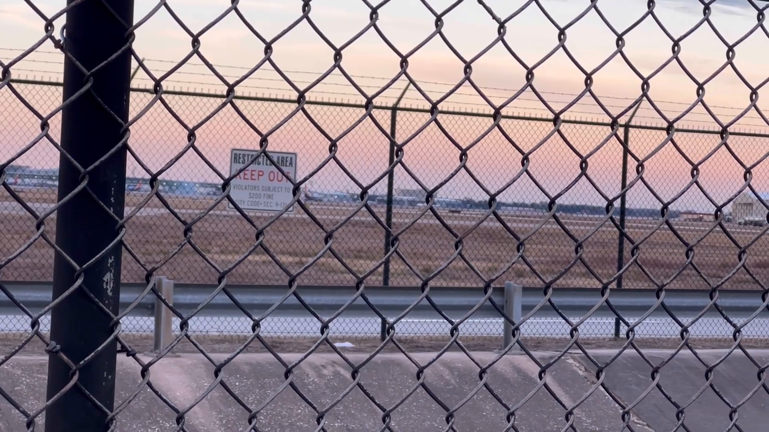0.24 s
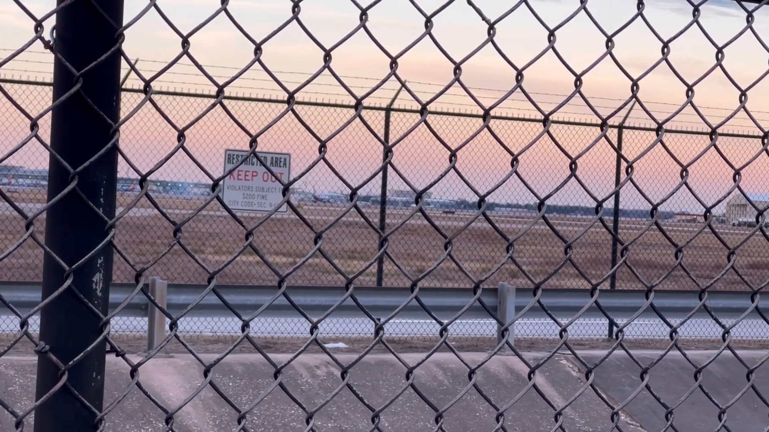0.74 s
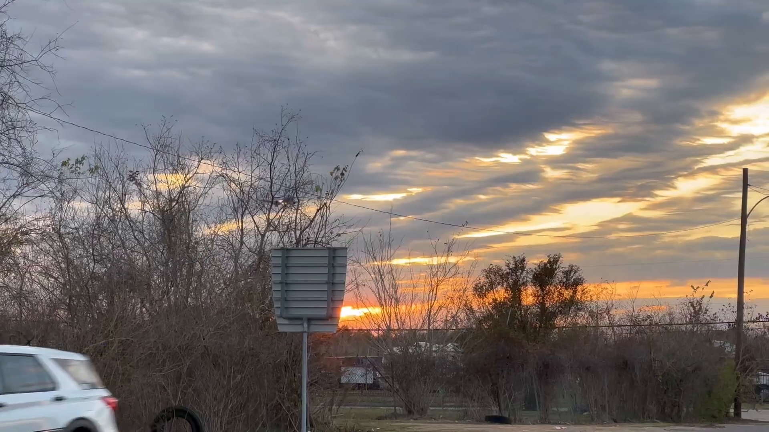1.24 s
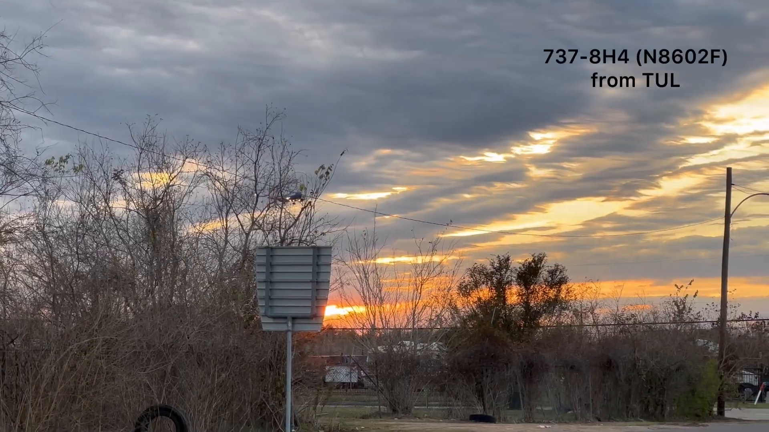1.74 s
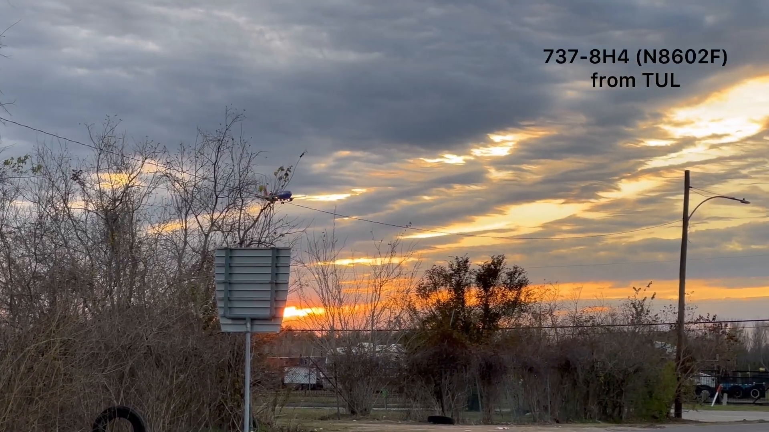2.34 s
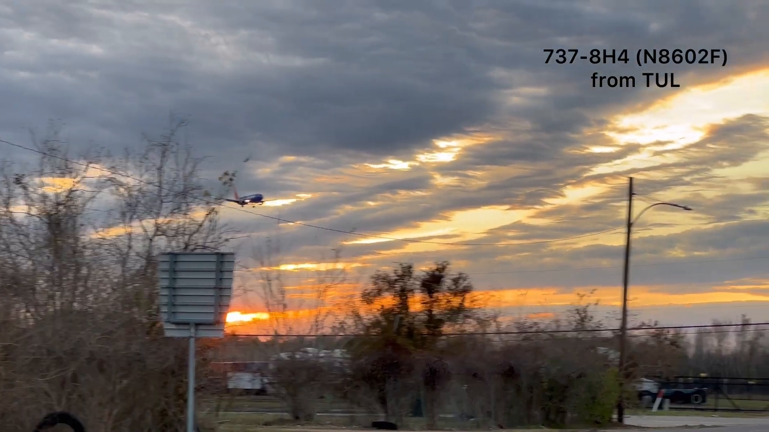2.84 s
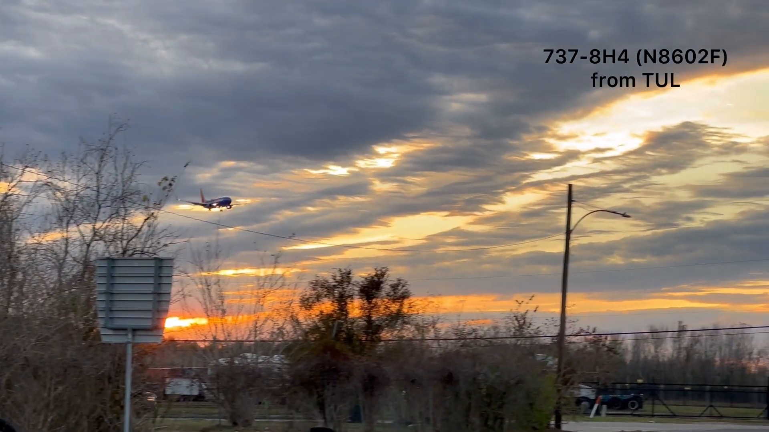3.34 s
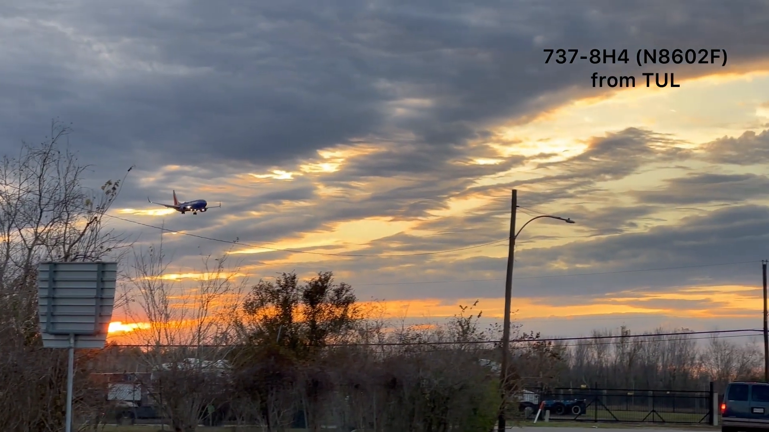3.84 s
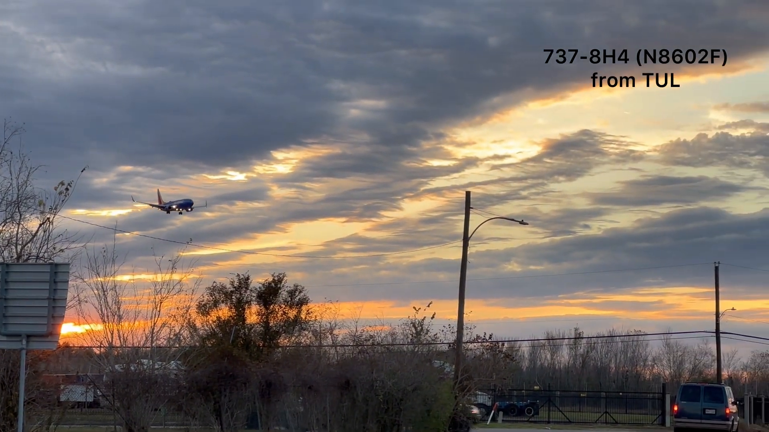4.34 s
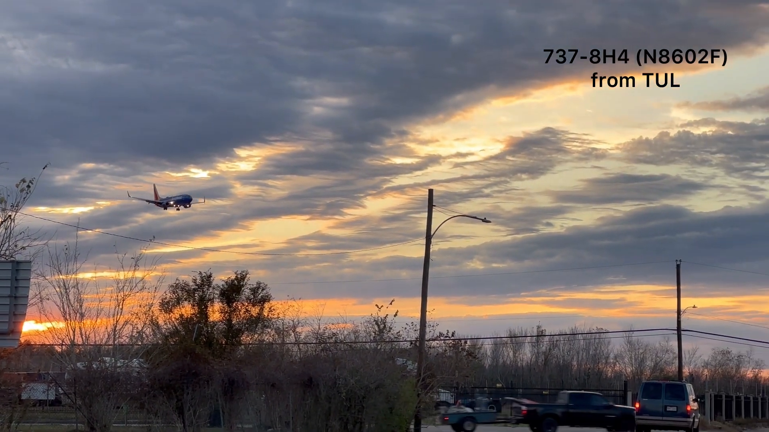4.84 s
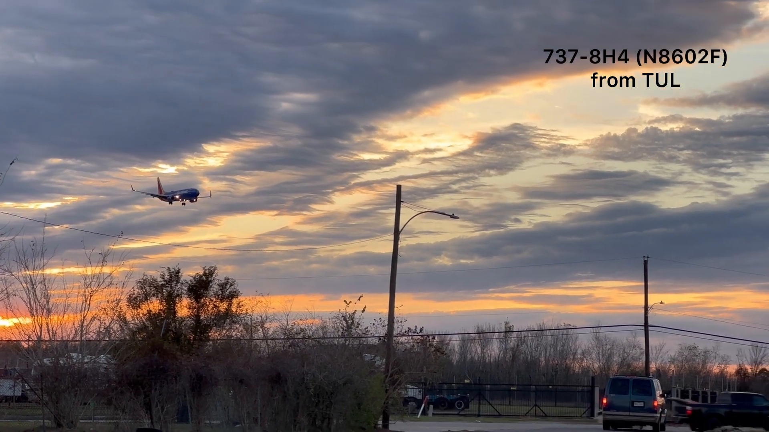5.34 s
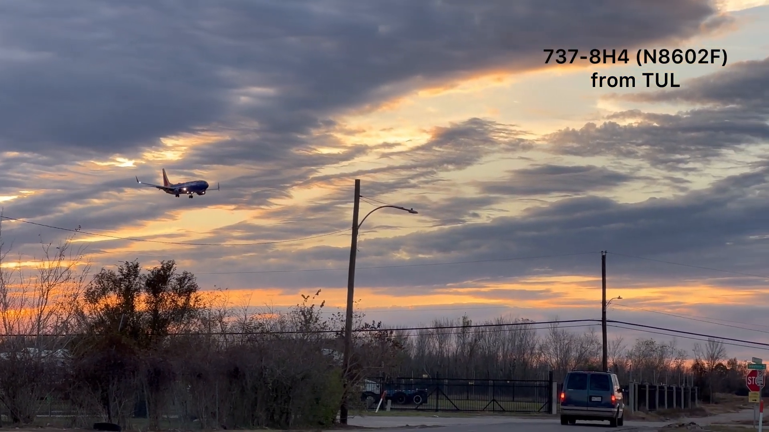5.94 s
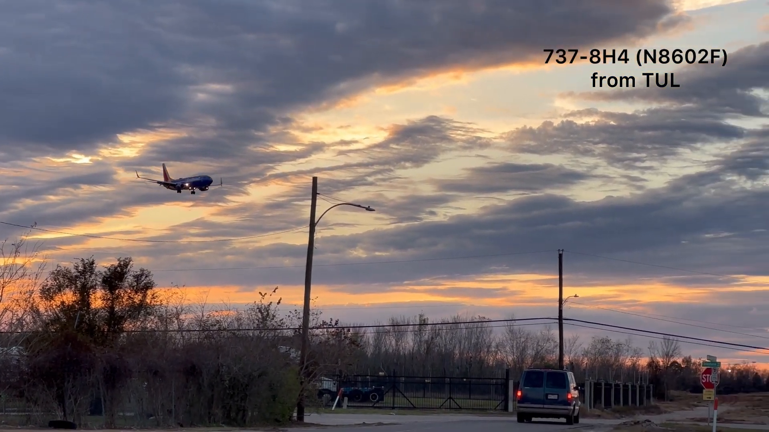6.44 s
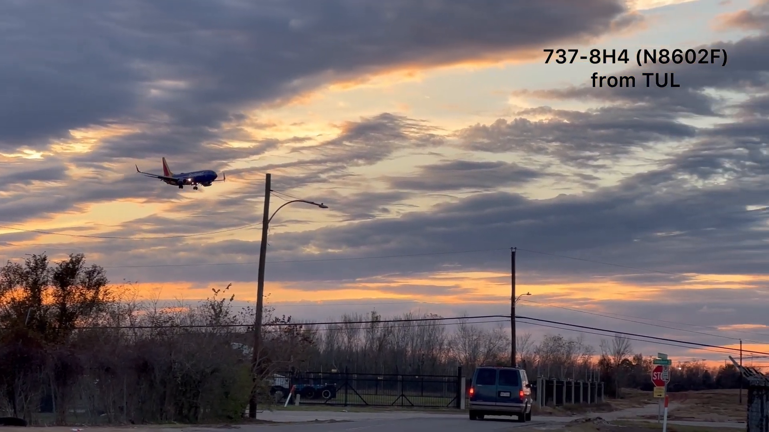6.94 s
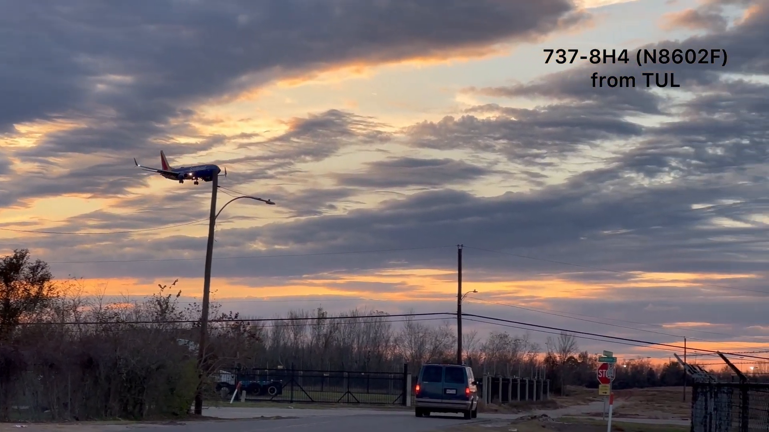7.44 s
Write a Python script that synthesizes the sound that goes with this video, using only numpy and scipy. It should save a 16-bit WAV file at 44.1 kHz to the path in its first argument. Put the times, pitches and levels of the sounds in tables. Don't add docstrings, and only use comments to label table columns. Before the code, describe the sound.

For the first 1.2 seconds, a low, far engine drone near 100 Hz sits over soft airfield hum, dipping deeply around 0.5 and briefly at 1.05. The scene then cuts abruptly to a louder roadside. Deep traffic rumble and surging heavy-engine throbs lie below a steady low drone. A car is already close: its tread roar, whoosh and bright hiss peak around 2.5, with hollow tyre resonance and tiny sharp stone clicks mostly from 1.7 to 2.9. It recedes from 3 to 5. A wavering, flickering fan whine near 1.6 kHz, with a lower whistle, strengthens and sinks slightly. The airliner's broad rushing roar, coloured by ground echo, swells from about 4, strongest near 7.1, with an added higher overtone after 5.4. Faint rustles come at 1.4, 4.5 and 6.5. It ends at 7.7 with the jet still near; wide outdoor stereo, phone microphones.

```python
import sys
import numpy as np
from scipy import signal
from scipy.fft import rfft, irfft, next_fast_len
from scipy.io import wavfile
from scipy.ndimage import uniform_filter1d, map_coordinates

SR = 44100
rng = np.random.default_rng(int(sys.argv[2]) if len(sys.argv) > 2 else 0)


def field_ratio(decibels):
    return 10 ** (np.asarray(decibels, dtype=float) / 20)


def materialize(psi):
    bounded = np.clip(np.atleast_2d(psi).T, -1, 1)
    quanta = np.round(bounded * 32767).astype(np.int16)
    wavfile.write(sys.argv[1], SR, quanta)


N = 340011
TIME_S = np.arange(N) / SR
CHANGE = 51488


def unit(x):
    return x / np.sqrt(np.mean(np.abs(x) ** 2) + 1e-20)


def along(points, hz):
    f, *columns = np.transpose(points)
    return [np.interp(np.log(hz + 1), np.log(f + 1), column) for column in columns]


def curves(rows, t=TIME_S):
    s, *columns = np.transpose(rows)
    return [np.interp(t, s, column) for column in columns]


def bumps(rows, t):
    return sum(db * np.exp(-((t - s) / half_s) ** 2) for s, db, half_s in rows)


def together(*dbs):
    return 10 * np.log10(sum(field_ratio(db) ** 2 for db in dbs))


def wobble(rate):
    coarse = np.arange(0, N + 32, 32)
    knots = rng.standard_normal(int(N * rate / SR) + 4)
    return np.interp(np.arange(N), coarse, map_coordinates(knots, [coarse * rate / SR]))


def tone(hz, db, blur):
    return np.sqrt(2) * field_ratio(db) * np.cos(2 * np.pi * np.cumsum(hz) / SR + blur)


# f/Hz, left lead [rad], likeness [0-1]
PORT_PAIR = [(2000, 0, .99), (2650, .05, .995), (2900, .5, .98), (4400, .45, .95), (4900, 0, .997),
             (6500, .05, .99), (7200, 1.3, .97), (7800, 2.9, .99), (8500, 3.14, .995), (9000, 1.9, .95),
             (9800, .6, .9), (10800, 0, .98), (13000, -.1, .9), (14000, -.6, .6), (15000, -2, .5)]


def rush(air, band, sides, gain_db, patchy_db, size=1024):
    hz, t, noise = signal.stft(rng.standard_normal((2, N)), SR, nperseg=size)

    beyond = np.maximum(np.log2((hz + 1) / air[-1][0]), np.log2(air[0][0] / (hz + 1)))
    shape = field_ratio(along(air, hz)[0] - 48 * np.clip(beyond, 0, None))
    inside = (hz >= band[0]) & (hz <= band[1])
    shape = shape / np.sqrt(np.mean(shape ** 2 * inside))

    grain = uniform_filter1d(rng.standard_normal(noise.shape[1:]), size // 100, 0)
    grain = uniform_filter1d(grain, 8200 // size, 1)
    patches = field_ratio(patchy_db * unit(grain))
    patches_rms = np.sqrt(np.mean(patches ** 2))

    alike, lead, left_db = along(sides, hz)
    bass = hz < PORT_PAIR[0][0]
    alike = np.where(bass, alike, along(PORT_PAIR, hz)[1])
    lead = np.where(bass, lead, 0)
    left_db = left_db * np.clip(2 - hz / 1100, 0, 1)

    turn = np.arccos(np.clip(alike, 0, 1))[:, None] / 2
    shared, apart = np.cos(turn) * noise[0], np.sin(turn) * noise[1]
    half = (field_ratio(left_db / 2) * np.exp(.5j * lead))[:, None]
    pair = [(shared + apart) * half, (shared - apart) / half]
    gain = shape[:, None] * patches / patches_rms * field_ratio(gain_db(hz[:, None], t))
    return signal.istft(pair * gain, SR, nperseg=size)[1][:, :N]


# t/s, level/dB, half length [s]
ENGINE_LULLS = [
    (.33, -3, 0.087),
    (.49, -19, 0.092),
    (.93, -2.5, .08),
    (1.045, -15, 0.044),
]


def far_engines():
    turns = 2 * np.pi * 97 * (np.arange(N) - CHANGE) / SR
    in_step_s, beat_s = 0.76, 0.65
    beat = np.cos(2 * np.pi * (TIME_S - in_step_s) / beat_s)
    first = -field_ratio(-31 + bumps(ENGINE_LULLS, TIME_S)) * np.cos(turns)
    second = beat * field_ratio(-43.5) * np.cos(2 * turns + .5 * wobble(14.0))
    return np.sqrt(2) * (first + second)


# f/Hz, level/dB per Hz
HUM_AIR = [(25, -15), (45, -7), (60, 3), (130, -3.5), (230, -15), (400, -26.5), (800, -25.5), (1500, -30),
           (2500, -41), (3600, -51), (4500, -60.5), (7000, -63), (9600, -80.5), (15000, -76)]
# f/Hz, likeness [0-1], left lead [rad], left-right level/dB
HUM_SIDES = [(80, 0.99, 0.0, 0.5), (200, 0.9, 0.1, 2.2), (400, 0.6, 1.2, 0.6), (600, 0.65, 1.5, -0.0),
             (850, 0.69, 1.5, 0.7), (1200, 0.57, 0.8, -1.7), (1700, 0.77, 0.1, 0.1)]


def airfield_hum():
    return rush(HUM_AIR, (250, 2000), HUM_SIDES, lambda hz, t: -47.5, patchy_db=-1.0, size=2048)


# t/s, level/dB
RUMBLE = [(1.2, -36.5), (2.05, -37), (2.4, -34), (3.6, -30.5), (4.9, -33), (5.8, -31.5), (6.9, -31),
          (7.3, -28), (7.7, -29.5)]
# f/Hz, level/dB per Hz
RUMBLE_AIR = [(25, -35.5), (40, -28.5), (60, 5), (90, -3), (140, -3.5), (200, -7), (300, -13), (450, -25)]
# f/Hz, likeness [0-1], left lead [rad], left-right level/dB
ROAD_SIDES = [(80, 0.99, 0.1, 0.0), (200, 0.98, 0.2, 0.4), (400, 0.93, 0.3, -0.0), (600, 0.69, 0.9, 0.7),
              (850, 0.76, 0.8, 1.2), (1200, 0.71, 0.6, 1.0), (1700, 0.97, -0.0, 1.0)]


def traffic_rumble():
    return rush(RUMBLE_AIR, (110, 300), ROAD_SIDES, lambda hz, t: curves(RUMBLE, t)[0],
                patchy_db=0.6, size=2048)


# f/Hz, level/dB per Hz
DEEP_AIR = [(25, -33.5), (40, -24), (60, -4.5), (80, -15), (110, -11)]
# t/s, level/dB, half length [s]
HEAVY_SURGES = [
    (1.22, 9.5, 0.11),
    (1.55, 8, 0.17),
    (1.9, 9.5, .05),
    (2.45, 7.5, 0.18),
    (3.2, 3, 0.33),
    (3.9, 5, 0.097),
    (4.6, 8, 0.21),
    (5.27, 5.5, .06),
    (5.8, 4.5, .2),
]


def heavy_throb():
    throb = rush(DEEP_AIR, (35, 80), ROAD_SIDES, lambda hz, t: -33 + bumps(HEAVY_SURGES, t),
                 patchy_db=3.0, size=4096)
    return field_ratio(-3.5) * throb


# t/s, f/Hz, level/dB
ROAD_DRONE = [(1.17, 92.5, -37), (2, 92, -28.5), (2.6, 91, -29.5), (3.3, 90, -29), (3.7, 89.5, -43.5),
              (4.6, 88, -37), (5.3, 87.5, -33.5), (6.3, 87, -27.5), (7, 86.5, -33), (7.71, 86.5, -26.5)]


def engine_drone():
    hz, db = curves(ROAD_DRONE)
    return tone(hz, db + 2.4 * wobble(3.5), 0.077 * wobble(4))


# t/s, level/dB under its closest
NEARNESS = [(1.2, -2.5), (1.65, -1.15), (2.45, 0.5), (3.0, -1.8), (3.44, -5), (3.76, -8.5), (4.0, -12.5),
            (4.5, -16.5), (5.2, -25.5)]


def tyre_db(t, closest_db, grows, late_s, far_db):
    return together(closest_db + grows * curves(NEARNESS, t - late_s)[0], far_db)


# f/Hz, level/dB per Hz
TREAD_COLOUR = [(250, -17), (330, -8), (460, -6.5), (600, -4.5), (750, -4), (890, -1), (1000, -8),
                (1150, -11), (1500, -14)]
WHOOSH_COLOUR = [(1000, -9), (1300, 3), (1700, 3), (2200, 6.5), (2900, 0.5), (3600, -6), (4200, -15.5),
                 (5200, -20.5)]
HISS_COLOUR = [(3500, -1), (4500, 0), (5100, -4), (5700, 1.5), (6400, -0.5), (7600, 0.5), (8800, -12.5),
               (10000, -19), (11800, -23.5), (14500, -25), (16000, -21.5)]
SPRAY_COLOUR = [(8000, -14), (8800, 0), (9600, 8), (10500, 2), (11500, -12.5)]
# f/Hz, likeness [0-1], left lead [rad], left-right level/dB
CAR_SIDES = [(80, 0.99, 0.1, -0.0), (200, 0.97, 0.2, 0.3), (400, 0.97, 0.6, 1.0), (600, 0.92, 0.9, 3.0),
             (850, 0.9, 0.7, 3.0), (1200, 0.84, 0.6, 3.2), (1700, 0.97, -0.0, 1.7)]


def tyres():
    def tread_db(hz, t):
        return tyre_db(t, closest_db=-39.5, grows=0.96, late_s=0.07, far_db=-41)

    def whoosh_db(hz, t):
        turbine_db = 0.79 * curves(ROAR, t)[0] - 20.5
        return together(tyre_db(t, closest_db=-52, grows=1.5, late_s=-0.05, far_db=-64.5), turbine_db)

    def hiss_db(hz, t):
        return tyre_db(t, closest_db=-63.5, grows=1.46, late_s=0.25, far_db=-81.5)

    def spray_db(hz, t):
        return tyre_db(t, closest_db=-74.5, grows=2, late_s=0.16, far_db=-94.5)

    tread = rush(TREAD_COLOUR, (350, 1100), CAR_SIDES, tread_db, patchy_db=1.1)
    whoosh = rush(WHOOSH_COLOUR, (2200, 3600), CAR_SIDES, whoosh_db, patchy_db=1.1)
    hiss = rush(HISS_COLOUR, (5000, 7200), CAR_SIDES, hiss_db, patchy_db=1.5, size=512)
    spray = rush(SPRAY_COLOUR, (9000, 11500), CAR_SIDES, spray_db, patchy_db=3.0, size=512)
    return tread + whoosh + hiss + spray


# t/s, level/dB, f/Hz
TYRE_CAVITY = [(1.2, -45, 443), (1.34, -39, 408), (1.5, -43, 398), (2.0, -48, 455), (2.25, -42, 425),
               (2.94, -36.5, 490), (3.35, -47, 455), (3.64, -41, 390), (4.2, -42, 380)]


def hollow_tyres():
    def ring_db(hz, t):
        db, centre_hz = curves(TYRE_CAVITY, t)
        gone_db = np.interp(t, [3.4, 4.6], [0, -20])
        return db + gone_db + 8 - 10 * np.log10(1 + ((hz - centre_hz) / 75) ** 4)

    flat = [(200, 0.0031), (1000, 0)]
    return rush(flat, (200, 1000), CAR_SIDES, ring_db, patchy_db=2.0, size=2048)


# t/s, level/dB, tilt [dB per octave]
ROAR = [(1.2, -61.5, 3.5), (2.5, -59.5, 6), (4.3, -51.5, 3), (4.7, -54.5, 4), (5.6, -47, -1.5),
        (6.15, -44.5, -4), (6.6, -44, -1), (7.15, -41, -2.5), (7.55, -43.5, -2.5), (7.7, -48.5, -3)]
# f/Hz, level/dB per Hz
ROAR_AIR = [(350, -14.5), (480, -2.5), (620, -2), (950, -5.5), (1300, -7), (1700, -8), (2600, -20.5),
            (3600, -54.5), (4600, -47.5), (7000, -61), (8500, -66), (9600, -65.5), (11500, -74.5),
            (16000, -73)]
# f/Hz, likeness [0-1], left lead [rad], left-right level/dB
JET_SIDES = [(80, 1.0, 0.0, 0.2), (200, 0.99, 0.1, 0.3), (400, 0.97, 0.2, 0.5), (600, 0.97, 0.3, 2.6),
             (850, 0.96, 0.4, 1.5), (1200, 0.9, 0.3, 3.2), (1700, 1.0, -0.0, 1.2)]


def jet_roar():
    def heard_db(hz, t):
        lag_s = np.interp(t, [4, 7.7], [1.1e-3, 1.14e-3])
        echo = .68 / (1 + (hz / 1900) ** 2)
        comb_db = 20 * np.log10(np.abs(1 + echo * np.exp(-2j * np.pi * hz * lag_s)))
        roar_db, tilt_db = curves(ROAR, t)
        return roar_db + tilt_db * np.log2((hz + 20) / 2000) + comb_db - 4.0

    return rush(ROAR_AIR, (1700, 2600), JET_SIDES, heard_db, patchy_db=1.2)


def approach_db():
    arrives_s = 8.67
    return -20 * np.log10(np.maximum(arrives_s - TIME_S, .5))


# t/s, level/dB, half length [s]
FAN_FADES = [(1.2, -12, 0.16), (1.61, -20, .06), (1.88, -14, 0.054), (2.05, -16, 0.046), (2.25, -4, .1),
             (2.43, -11, .07), (2.79, -18, .025), (2.99, -9, 0.071), (3.19, 3.5, .1), (3.47, -17, 0.02),
             (3.68, -19, 0.081), (3.82, -11, .035), (3.91, 1, .04), (3.99, -15, .02), (4.14, -9, 0.053),
             (4.31, -8, 0.051), (4.68, -12, 0.13), (4.85, -18, 0.055), (4.95, 2, 0.031), (5.08, -8, 0.043),
             (5.26, -6, .05), (5.76, -10.5, 0.051), (5.98, 5.5, 0.1), (6.11, -7, 0.027), (6.45, -4.5, 0.11),
             (6.65, -13, 0.046), (6.76, 2, 0.098), (7.02, -4, 0.018), (7.14, -17.5, 0.037), (7.33, -6, .03),
             (7.66, -10.5, 0.088)]


def fan_tone(hz, blur):
    db = -31.5 + approach_db() + bumps(FAN_FADES, TIME_S)
    return tone(hz, db - 4.0 + 1.4 * wobble(28), blur)


def airframe_whistle(fan_hz):
    return tone(fan_hz * .3835, -44 + approach_db() + 3 * wobble(8.1), wobble(11))


# t/s, level/dB, half length [s]
OVERTONE_GLINTS = [
    (5.62, 4.5, .2),
    (6.0, 7.5, .07),
    (6.24, 10, .05),
    (6.94, 7, .06),
    (7.1, 8.5, .08),
    (7.39, 6, .1),
    (7.61, 6, .04),
]


def fan_overtone(hz, blur):
    rise_db = np.interp(TIME_S, [5.2, 5.48], [-25, 0])
    db = -67 + 0.52 * approach_db() + bumps(OVERTONE_GLINTS, TIME_S)
    return tone(2 * hz, db + rise_db + 1.5 + 1.5 * wobble(18), 2 * blur + .5 * wobble(40))


# t/s, f/Hz
BLADE_RATE = [(1.17, 1607), (3.2, 1603), (4.5, 1598), (5.9, 1595), (6.9, 1589.5), (7.4, 1586.5),
              (7.71, 1583)]


def jet():
    hz, = curves(BLADE_RATE)
    blur = .45 * wobble(7) + .25 * wobble(24)
    tones = fan_tone(hz, blur) + airframe_whistle(hz) + fan_overtone(hz, blur)
    return jet_roar() + tones * field_ratio(0) * np.array([[1], [-1]]) * 0 + tones * field_ratio([[.6], [-.6]])


# t/s, level/dB, f/Hz, time to fall 20 dB [s], upper edge over centre
RUSTLES = [
    (1.39, -74, 13500, .14, 1.55),
    (4.462, -64, 6200, .12, 1.45),
    (6.455, -67, 6600, .12, 1.2),
]


def rustles():
    out, t = np.zeros(N + SR), np.arange(SR // 4) / SR
    for s, db, hz, life_s, wide in RUSTLES:
        edges_hz = [hz / wide, min(hz * wide, SR / 2.1)]
        band = signal.butter(2, edges_hz, "band", fs=SR, output="sos")
        air = unit(signal.sosfilt(band, rng.standard_normal(len(t))))
        out[round(s * SR):][:len(t)] += field_ratio(db - 20 * t / life_s) * (1 - np.exp(-t / .006)) * air
    return out[:N]


# t/s, peak level/dB, f/Hz, life [ms], crack level/dB
STONES = [(1.694, -35.5, 7500, 0.91, -13.5), (1.7535, -62, 6640, 0.9, -19), (1.7958, -46.5, 6660, 0.9, -22),
          (1.961, -42, 7400, 0.9, -8.5), (2.1153, -45, 6500, 0.72, -12), (2.2085, -49, 5890, 0.8, -6),
          (2.212, -49, 5800, 0.8, 3), (2.2676, -35.5, 5970, 0.99, 0.5), (2.3254, -48, 7200, 0.98, 1.5),
          (2.4656, -49, 4400, 1.2, -7.5), (2.5628, -47, 5430, 0.82, -6.5), (2.6852, -47, 6650, 1, 0),
          (2.8455, -38, 7310, 0.93, -1), (2.8532, -48.5, 5690, 0.81, -4), (2.923, -46.5, 5530, 0.9, -4),
          (3.6174, -54, 6810, 0.95, 4.5)]


def grit():
    out, t = np.zeros(N + SR), np.arange(SR // 4) / SR
    dull = signal.butter(3, [2000, 10000], "band", fs=SR, output="sos")
    for s, db, hz, life_ms, crack_db in STONES:
        decay = np.exp(-t * 1e3 / life_ms)
        ring = decay * (1 - np.exp(-t / 3e-4)) * np.sin(2 * np.pi * hz * t)
        crack = signal.sosfilt(dull, rng.standard_normal(len(t)) * decay)
        out[round(s * SR):][:len(t)] += field_ratio(db + 4.5) * (ring + field_ratio(crack_db) * crack)
    return out[:N]


def ports(x):
    size = next_fast_len(N + 8192)
    lead = along(PORT_PAIR, np.fft.rfftfreq(size, 1 / SR))[0]
    return irfft(rfft(x, size) * np.exp(.5j * lead * [[1], [-1]]), size)[:, :N]


def scene():
    fence = far_engines() + airfield_hum()
    road = traffic_rumble() + heavy_throb() + engine_drone()
    car = tyres() + hollow_tyres() + rustles() + grit()
    since_s = (np.arange(N) - CHANGE) / SR
    fade_in = np.clip(since_s / .022, 0, 1) ** 1.5
    return ports(fence) * (since_s < 0) + ports(road + car + jet()) * fade_in


def top_cut(x):
    return signal.sosfilt(signal.butter(12, 15720, fs=SR, output="sos"), x)


def record(dry):
    whine = sum(tone(np.full(N, hz), -98 + 4 * wobble(90), wobble(90)) for hz in (9510, 9690))
    hiss = field_ratio(-101) * rng.standard_normal((2, N))
    roll_off = signal.butter(2, 33, "high", fs=SR, output="sos")
    mix = signal.sosfilt(roll_off, dry + whine + hiss)
    return top_cut(mix)


dry = scene()
out = record(dry)
materialize(out)
```